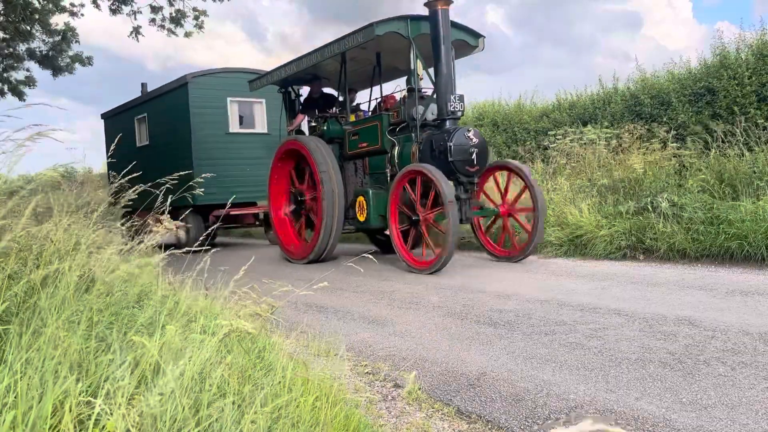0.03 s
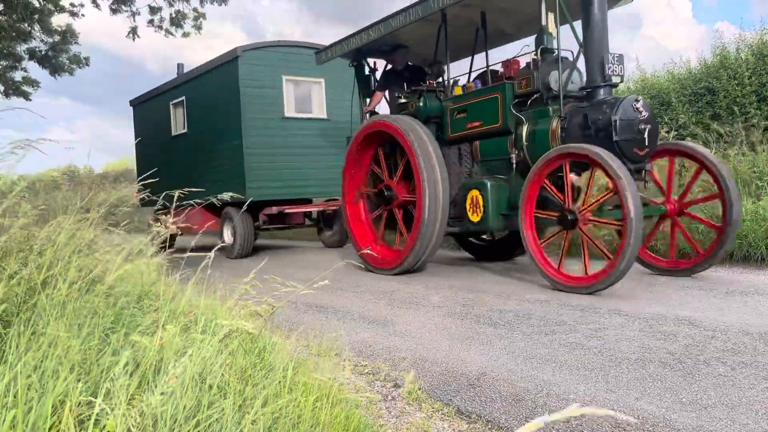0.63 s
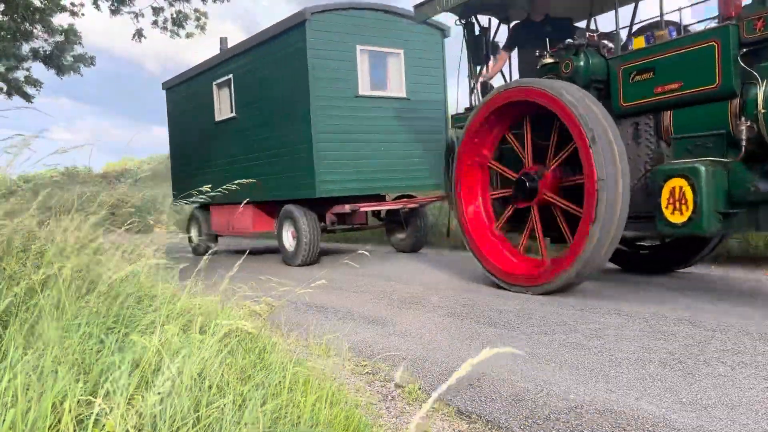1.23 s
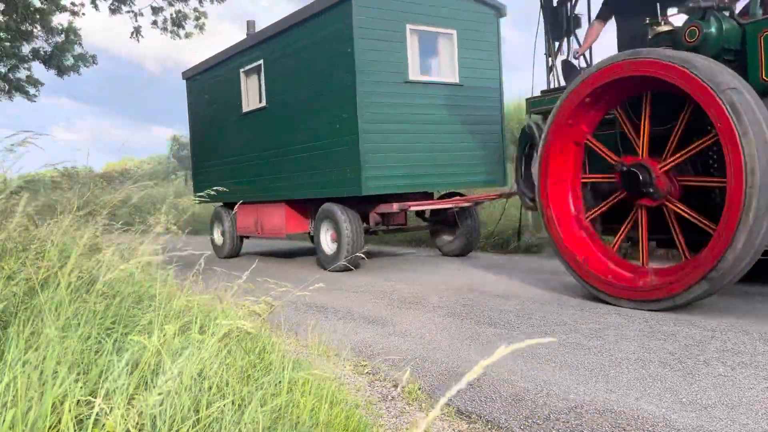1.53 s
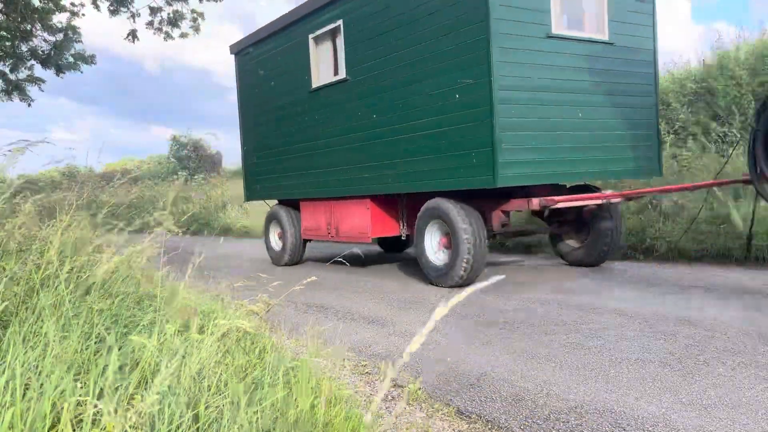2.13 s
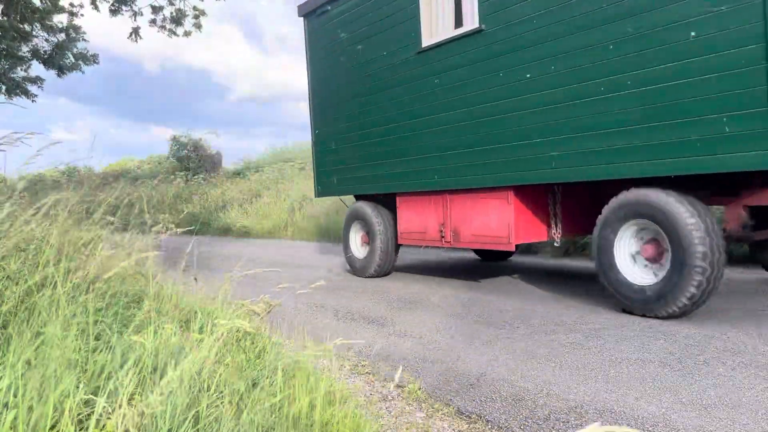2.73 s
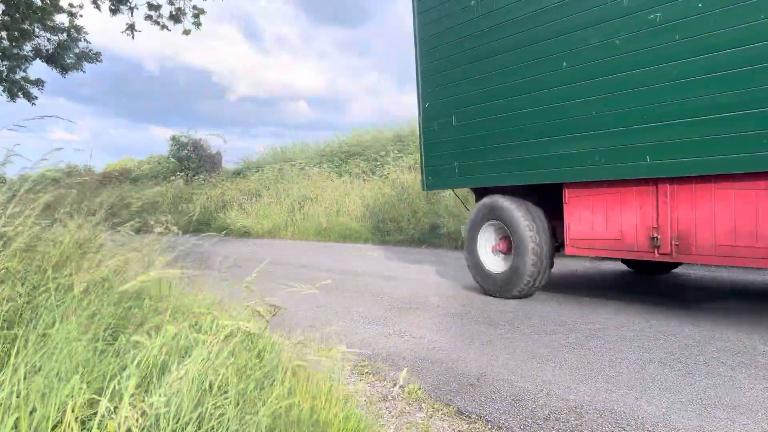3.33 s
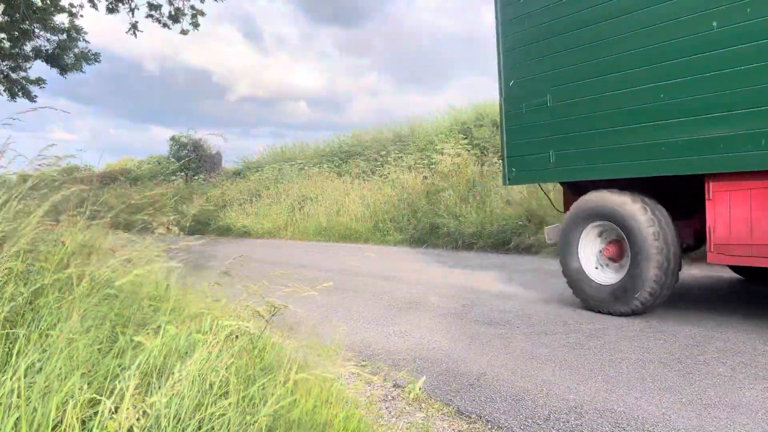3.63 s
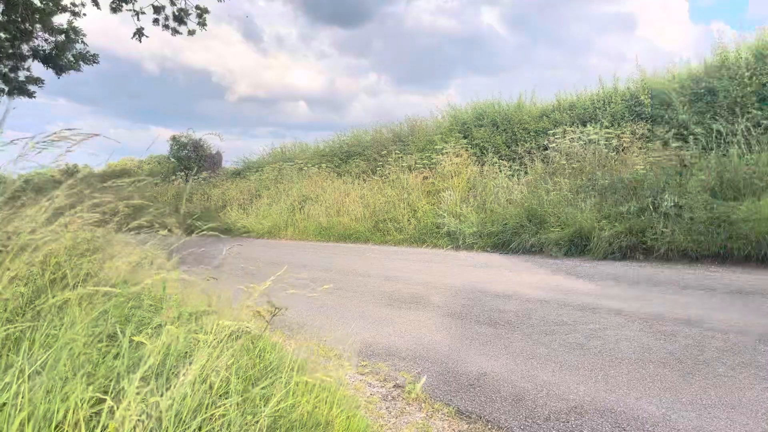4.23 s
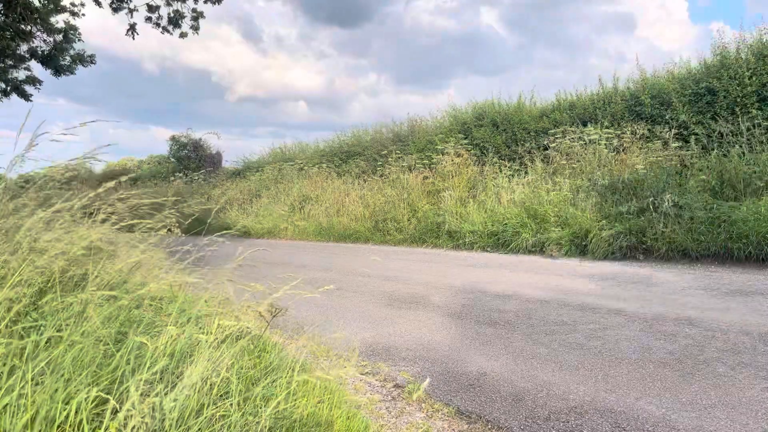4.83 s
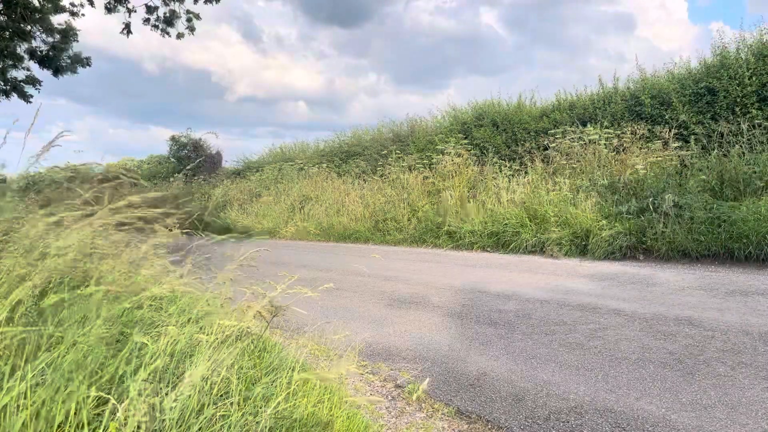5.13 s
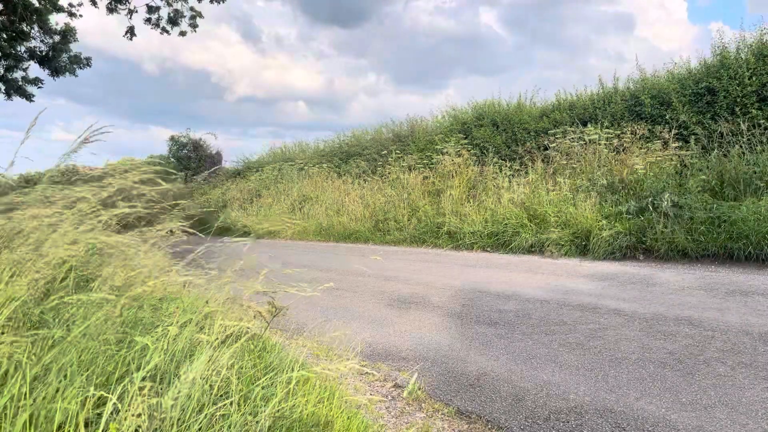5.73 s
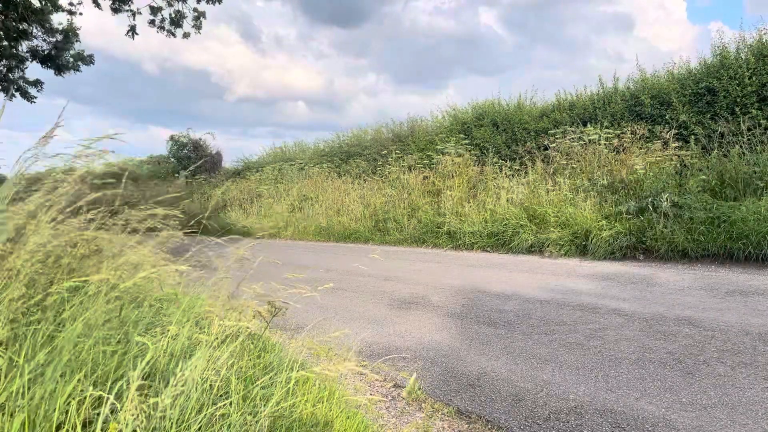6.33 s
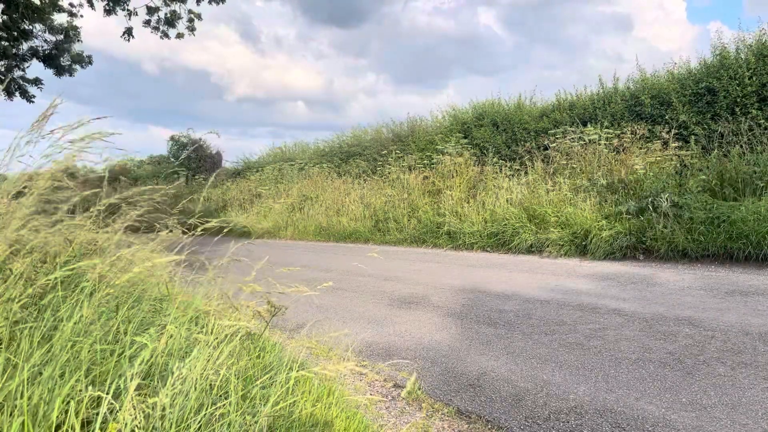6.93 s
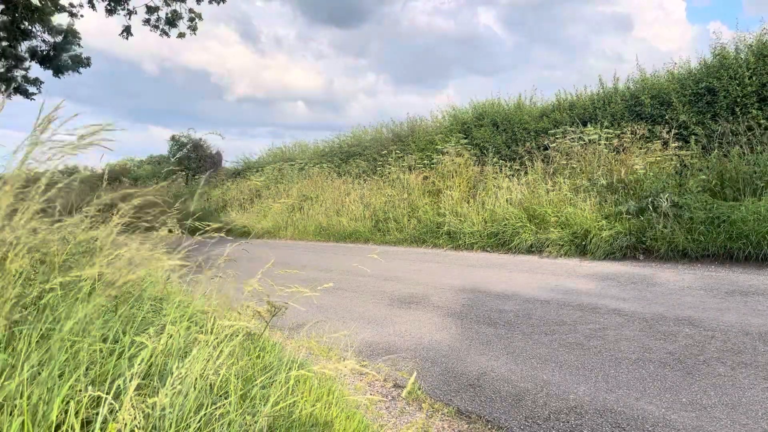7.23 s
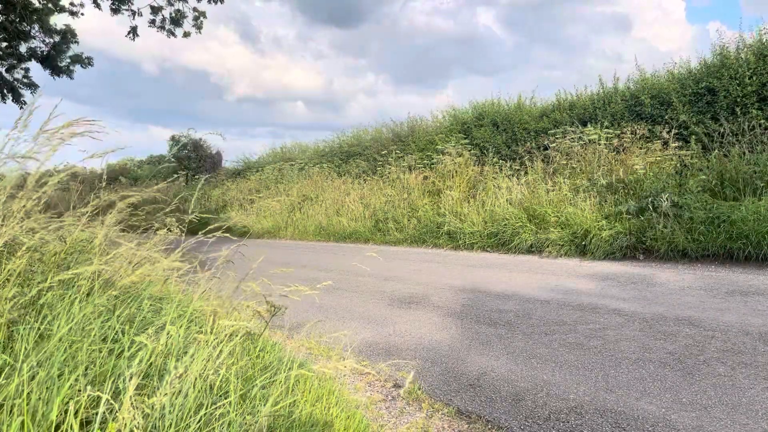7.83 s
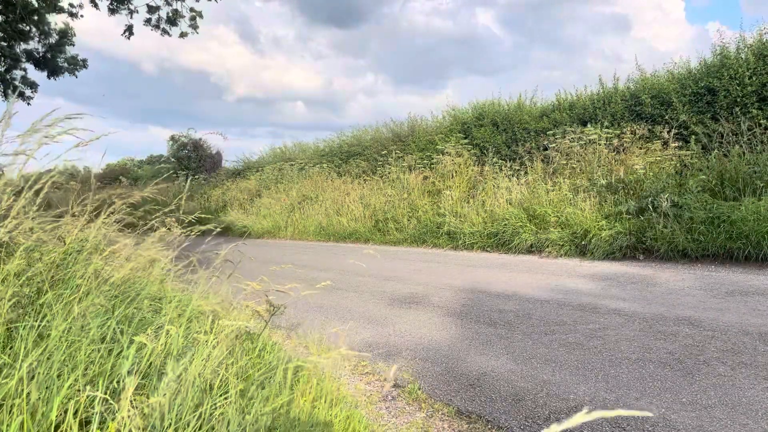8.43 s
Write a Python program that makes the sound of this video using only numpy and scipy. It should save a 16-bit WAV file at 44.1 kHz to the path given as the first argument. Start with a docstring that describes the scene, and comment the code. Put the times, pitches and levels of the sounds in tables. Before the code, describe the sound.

A steam traction engine chuffs and clatters past close by, blows one long and one short whistle, then recedes much quieter.

```python
"""Quick exhaust thuds, four to a crank turn, and the clatter of open gears: a steam traction engine tows
a living van close past on a country lane. Meshing teeth hum, a wheel chinks, road grit sets the ironwork
rumbling, steam hisses at the glands and grass rustles on the verge. Once past, it blows a three-pipe
chime whistle, one long blast and one short. The whistle drives an automatic gain control far down,
so the engine leaves much quieter than it came."""
import sys
import numpy as np
from scipy import signal
from scipy.fft import rfft, irfft
from scipy.io import wavfile
from scipy.ndimage import uniform_filter1d, minimum_filter1d

SR = 44100
rng = np.random.default_rng(int(sys.argv[2]) if len(sys.argv) > 2 else 0)


def unload_wav(signal):
    """Save mono or channel-first audio to the path in sys.argv[1] as 16-bit WAV at rate SR, clipped to [-1, 1]."""
    wavfile.write(
        sys.argv[1],
        SR,
        np.round(np.clip(np.atleast_2d(signal).T, -1, 1) * 32767).astype(np.int16),
    )


N = 379260
TIME = np.arange(N) / SR
ROAD_M_PER_S = 2.56

# engine speed: t/s, exhaust beat rate/Hz
BEAT_RATE = [(0, 13.29), (2.4, 13.29), (3.5, 13.17), (5.3, 13.56), (7.2, 13.73), (8.6, 13.68)]
# modes of the gear train: f/Hz, bandwidth/Hz, level/dB
GEAR_MODES = [(946, 88, -6), (1035, 35, -2), (1067, 22, -4), (1196, 45, -3), (1375, 47, 3), (1441, 22, 3.5),
              (1473, 75, -2.5), (1617, 31, 2), (1695.5, 14, 3.5), (1720, 21, -5.5), (1838, 45, -5),
              (2673, 400, -18), (3455, 54, -12), (4760, 63, -13.5), (5200, 100, -18)]
# modes of the ringing wheel: f/Hz, bandwidth/Hz, level/dB
WHEEL_MODES = [(1692, 22, -8), (2050, 44, -6), (2102, 27, 0), (3400, 50, -20)]
# dull knock of iron on iron: f/Hz, level/dB
KNOCK_SPECTRUM = [(60, -24.5), (120, -0.5), (240, 1), (400, -17), (600, -2.5), (1000, -12.5), (1900, -4),
                  (2500, -19), (5000, -27.5), (8000, -83.5), (9600, -85)]
# hiss of leaking steam, also used for scraping teeth: f/Hz, level/dB
HISS_SPECTRUM = [(1500, -9), (2250, -0.5), (2650, -18), (3450, -5), (4000, -1), (4700, 0.5), (5300, 1),
                 (6300, -7.5), (7300, -15), (8600, -21)]

# passage of a part: nearest t/s, distance/m, level/dB, excess loss/(dB/m), lift on approach/dB
GEAR_PASS = (2.03, 6.5, -27, 0.96, 8.5)
WHEEL_PASS = (2.5, 2, -34.5, 0.36, -2)
# track that sets a part's direction: abreast t/s, distance/m
ENGINE_PLACE, GEAR_PLACE, WHEEL_PLACE = (2.01, 5), (2.325, 2.98), (2.2, 1)


def gain_of(db):
    """Amplitude ratio of a level in decibels."""
    return 10 ** (np.asarray(db) / 20)


def unit_rms(x):
    """Normalisation to unit mean power."""
    return x / np.sqrt(np.mean(x ** 2) + 1e-20)


def follow(rows):
    """Linear interpolation of each column of a time table at every sample."""
    times, *columns = np.transpose(rows)
    return [np.interp(TIME, times, column) for column in columns]


def value_at(points, hz):
    """Interpolation of a spectrum on a logarithmic frequency axis."""
    f, value = np.transpose(points)
    return np.interp(np.log(hz + 1), np.log(f + 1), value)


def drift(hz):
    """Random fluctuation: low-passed Gaussian noise of unit rms."""
    f = np.fft.rfftfreq(N, 1 / SR)
    return unit_rms(irfft(rfft(rng.standard_normal(N)) * np.exp(-(f / hz) ** 2), N))


def colour(x, spectrum, size=16384):
    """Minimum-phase filtering to the given spectrum."""
    log_gain = np.log(gain_of(value_at(spectrum, abs(np.fft.fftfreq(size, 1 / SR)))))
    response = np.fft.ifft(np.exp(np.conj(signal.hilbert(log_gain)))).real[:size // 2]
    return signal.oaconvolve(x, response)[:N]


def ring(x, modes):
    """Modal superposition: damped resonators summed with alternating sign."""
    return sum((-1) ** k * gain_of(db) * signal.lfilter(*signal.iirpeak(hz, hz / width, SR), x)
               for k, (hz, width, db) in enumerate(modes))


def impacts(per_s, spread_db):
    """A Poisson process of blows, most small and a few large."""
    size = gain_of(spread_db * np.minimum(rng.exponential(1, N), 4))
    return unit_rms(size * rng.choice([-1, 1], N) * (rng.random(N) < per_s / SR))


def beat_count(lead_s=0.0, first_beat_s=0.0567):
    """Phase of the engine in exhaust beats: the integral of their rate."""
    rate = follow(BEAT_RATE)[0]
    return np.cumsum(rate) / SR + rate * lead_s - rate[0] * first_beat_s


def load(depth_db=1.5, lag_strokes=0.045):
    """Amplitude modulation: the drive presses harder at every piston stroke (two beats)."""
    return gain_of(depth_db * np.cos(2 * np.pi * (beat_count() / 2 - lag_strokes)))


def passing_db(nearest_s, nearest_m, db, loss_db_per_m, approach_db):
    """Spherical spreading, ground loss and directivity set the level of a part that rolls by."""
    # slow swell and sag of the whole engine: t/s, level/dB
    swell = [(0, 0.3), (.6, 1.7), (2.3, 1.24), (2.8, 0.5), (3.3, 3), (4.4, 2.9), (4.85, 4.5), (5.7, 2.5),
             (6.3, 3.5), (7.4, 2), (8.3, 4.5)]
    along_m = ROAD_M_PER_S * (TIME - nearest_s)
    range_m = np.hypot(along_m, nearest_m)
    loss_db = 20 * np.log10(range_m / nearest_m) + loss_db_per_m * (range_m - nearest_m)
    return db - loss_db - approach_db * along_m / range_m + follow(swell)[0]


def angle(t, abreast_s, across_m):
    """Angle of incidence in radians: negative on approach, zero abreast."""
    return np.arctan(ROAD_M_PER_S * (t - abreast_s) / across_m)


def doppler(nearest_s, nearest_m, max_shift=0.013):
    """Doppler effect: the frequency ratio is above 1 on approach and below 1 in retreat."""
    along_m = ROAD_M_PER_S * (TIME - nearest_s)
    return 1 - max_shift * along_m / np.hypot(along_m, nearest_m)


def rolling_ring(x, modes, nearest_s, nearest_m):
    """Moving resonator: its modes ring in source time and arrive Doppler-shifted."""
    emitted_s = np.cumsum(doppler(nearest_s, nearest_m)) / SR
    source_s = np.arange(0, emitted_s[-1], 1 / SR)
    return np.interp(emitted_s, source_s, ring(np.interp(source_s, emitted_s, x), modes))


def lane(x, place, wet_db, t60, size=1024, slant_rad=0.74):
    """Scattering adds a short tail; phase and level differences at two microphones give direction."""
    # share scattered by hedge, road and van: f/Hz, level/dB
    scatter = [(60, -27), (200, -22.5), (450, -7.5), (800, -4), (1400, 0), (2200, 12), (4000, 8.5),
               (9000, 12.5)]
    # phase lag of the left microphone for sound from hard right: f/Hz, lag/rad
    phase_lag = [(130, .1), (200, .7), (300, 1.3), (520, 1.45), (690, 2.3), (800, 2.35), (1000, 3.1),
                 (1500, 3.4), (2000, 4.9), (3500, 8.3), (10000, 25)]
    # left over right for sound from ahead: f/Hz, level/dB
    tilt_ahead = [(100, 0.5), (300, -2.5), (500, -3.5), (730, -8.5), (1020, 4), (1500, -6.5), (2600, -0.5),
                  (3400, 1.5), (5500, -2), (7000, 2.5), (8100, 18), (9500, -2)]
    # left over right for sound from the right: f/Hz, level/dB
    tilt_right = [(100, 0.5), (200, 5), (450, -3), (690, 1.5), (1100, 3.5), (1650, 0.5), (2600, -5.5),
                  (3400, 0), (5500, -5), (7000, 5.5), (8100, 13), (9500, 0.5)]
    framing = dict(nperseg=size, noverlap=size - size // 4)
    hz, t, spectra = signal.stft(x, SR, **framing)
    # the paths keep changing as the engine moves, so the tail has random phase
    decay = gain_of(-60 * t[1] / t60) ** 2
    lingering = np.sqrt(signal.lfilter([0, 1 - decay], [1, -decay], abs(spectra) ** 2))
    shape = (2, *spectra.shape)
    tail = np.sqrt(2) * lingering * (rng.standard_normal(shape) + 1j * rng.standard_normal(shape))
    hz, side = hz[:, None], np.array([0.5, -0.5])[:, None, None]
    azimuth = angle(t, *place) + slant_rad  # the pair faces up the lane at a slant
    direct = spectra * np.exp(-1j * side * np.sin(azimuth) * value_at(phase_lag, hz))
    wet = gain_of(value_at(scatter, hz) + wet_db)
    pair = (direct + wet * tail) / np.sqrt(1 + wet ** 2)
    # the housing shades each microphone differently as the source moves round it
    turned = np.sin(np.clip(azimuth, 0, np.pi / 2)) ** 2
    tilt = gain_of(side * ((1 - turned) * value_at(tilt_ahead, hz) + turned * value_at(tilt_right, hz)))
    pair *= tilt / np.sqrt(np.mean(tilt ** 2, axis=0))
    return signal.istft(pair, SR, **framing)[1][:, :N]


def grass(level_db=-48):
    """Flow noise: a steady breeze stirs the verge, uncorrelated between left and right."""
    # breeze in the grass: f/Hz, level/dB
    rustle = [(30, 0), (90, -3), (220, 14.5), (500, -6), (1100, -3), (2000, -8), (2700, -24.5),
              (3600, -0.5), (5000, -21.5), (6500, -6), (8000, -35.5), (9400, -46.5)]
    return gain_of(level_db) * np.array([unit_rms(colour(rng.standard_normal(N), rustle)) for _ in range(2)])


def glands(flutter_db=0.95):
    """Turbulent leakage: steam fizzes past the rods and excites a thin 8 kHz ring of the microphone."""
    # resonance of the microphone: f/Hz, bandwidth/Hz, level/dB
    mic_modes = [(7980, 230, -0.5), (8340, 330, -2)]
    fizz_pass = (3.5, 2.5, -37, -0.29, 6)
    mic_ring_pass = (1.4, 2.5, -54, 0.9, 3)  # the ring fades as the engine moves away
    fizz = unit_rms(colour(impacts(9000, 2.8), HISS_SPECTRUM))
    mic_ring = unit_rms(ring(ring(fizz, mic_modes), mic_modes))
    hiss = fizz * gain_of(passing_db(*fizz_pass)) + mic_ring * gain_of(passing_db(*mic_ring_pass))
    return hiss * gain_of(flutter_db * drift(30))


def gear_hum(cycles_per_beat=26.65, waver=0.02, throb_db=3.5):
    """Mesh frequency: the teeth hum at a pitch tied to engine speed, wavering and throbbing at random."""
    hum_pass = (1.6, 4, -38, 0.15, 2)
    hz = cycles_per_beat * follow(BEAT_RATE)[0] * doppler(*hum_pass[:2]) * (1 + waver * drift(21))
    tone = gain_of(throb_db * drift(21)) * np.sin(2 * np.pi * np.cumsum(hz) / SR)
    return unit_rms(tone) * gain_of(passing_db(*hum_pass))


def rubbing_iron():
    """Frictional excitation lifts single resonances out of the clatter; each swells and dies away."""
    # notes of the ironwork: t/s, half length/s, f/Hz, bandwidth/Hz, level/dB
    notes = [(0.35, 0.5, 845, 60, -35), (2.04, 0.06, 338, 16, -23), (2.43, 0.17, 679, 12, -26),
             (2.4, 0.45, 1185, 34, -36), (4.95, 0.6, 1145, 90, -43), (5.2, 0.3, 1678, 30, -48),
             (6.3, 0.8, 1110, 150, -49), (6.2, 0.6, 1675, 34, -52)]
    out = np.zeros(N)
    for t, half_s, hz, width, db in notes:
        mode = [(hz, width, 0)]
        note = unit_rms(ring(ring(impacts(600, 1), mode), mode))
        out += note * gain_of(db) * np.exp(-0.5 * ((TIME - t) / half_s) ** 4)
    return out


def wheel():
    """Sustained resonance: light taps keep one wheel singing with a thin note."""
    taps = impacts(260, 1) * load()
    return unit_rms(rolling_ring(taps, WHEEL_MODES, *WHEEL_PASS[:2])) * gain_of(passing_db(*WHEEL_PASS))


def chinks():
    """Cascaded resonance: a harder tap, filtered twice by the wheel's modes, swells into a clear chink."""
    # harder taps on the wheel: t/s, peak level/dB
    hard_taps = [(0.165, -26), (0.357, -19.5), (0.432, -25), (0.538, -24), (0.648, -22.5), (0.806, -28),
                 (0.885, -32), (0.962, -24.5), (1.265, -23), (1.435, -29), (1.582, -28.5), (2.485, -22),
                 (2.9, -23.5)]
    taps = np.zeros(N)
    for t, db in hard_taps:
        taps[round(t * SR)] = gain_of(db)
    unit_peak = abs(ring(ring(signal.unit_impulse(SR // 10), WHEEL_MODES), WHEEL_MODES)).max()
    return rolling_ring(ring(taps, WHEEL_MODES), WHEEL_MODES, *WHEEL_PASS[:2]) / unit_peak


def gears(level_db=-2, knock_db=-9):
    """Impact excitation: the open teeth rattle under load and ring the gear train."""
    teeth = impacts(600, 2.0) * load()
    ringing = unit_rms(rolling_ring(teeth, GEAR_MODES, *GEAR_PASS[:2]))
    knock = gain_of(knock_db) * unit_rms(colour(teeth, KNOCK_SPECTRUM))
    return (ringing + knock) * gain_of(passing_db(*GEAR_PASS) + level_db)


def clanks(rattle_s=0.016, scrape_s=0.025, level_db=-4.0, rebounds=5):
    """Backlash: each snatch of the gears is a hard blow and its rebounds, with a short bright scrape."""
    # snatches of the gears: t/s, relative level/dB, scrape offset/dB
    snatches = [(0.195, 2.5, -28), (0.228, -2, -32), (0.349, 2.5, -26), (0.417, -6, -22), (0.534, 6, -17.5),
                (0.788, 9.5, -17), (0.868, 3, -16), (0.909, 6, -27), (0.953, 5, -15), (1.095, -5.5, -2),
                (1.247, 2.5, -15), (1.272, 3.5, -16.5), (1.574, 7, -19), (1.708, -7, 3),
                (1.864, 7.5, -29.5), (2.004, 0, -14), (4.163, 9.5, -6.5), (4.549, -8, -21), (4.714, 3, -10),
                (4.765, 7.5, -6), (4.934, -18, -10), (5.167, 4.5, -6)]
    blows, scrape_envelope = np.zeros((2, N))
    for t, db, scrape_db in snatches:
        delays = np.append(0, 2 * rattle_s * rng.random(rebounds))
        sizes = np.exp(-delays / rattle_s / 2)
        blows[np.round((t + delays) * SR).astype(int)] += gain_of(db) * sizes / np.linalg.norm(sizes)
        onset = round(t * SR)
        age = TIME[:N - onset]
        scrape_envelope[onset:] += gain_of(db + scrape_db) * np.exp(-np.minimum(age / scrape_s, 20))
    blow_rms = np.linalg.norm(ring(signal.unit_impulse(SR // 4), GEAR_MODES)) / np.sqrt(2 * rattle_s * SR)
    ringing = gain_of(level_db) * rolling_ring(blows, GEAR_MODES, *GEAR_PASS[:2]) / blow_rms
    scrape = scrape_envelope * unit_rms(colour(impacts(2800, 2.7), HISS_SPECTRUM))
    return (ringing + scrape) * gain_of(passing_db(*GEAR_PASS))


def frame(level_db=-2.5, rims_db=-2.5, knock_db=-9, rims_fade=0.13, knock_fade=0.1, lurch_db=0.5):
    """Forced vibration: road grit shakes frame and rims; the verge absorbs rims and knocks first."""
    # modes of the frame: f/Hz, bandwidth/Hz, level/dB
    frame_modes = [(177.5, 9.2, 5), (310, 85, 1.5), (337, 49.4, 12), (382, 11, -5)]
    # modes of the wheel rims: f/Hz, bandwidth/Hz, level/dB
    rim_modes = [(405, 20, -6), (477, 32, -1.5), (506, 24, -2.5), (631, 63, -6.5), (687.7, 19, 0.5),
                 (857, 21, -4.5)]
    # brief booms of the frame: t/s, half length/s, level/dB
    jolts = [(1.24, 0.053, 2), (2.05, 0.056, 3), (2.213, 0.0097, 5), (2.495, 0.15, 2.5), (2.969, 0.02, 12)]
    frame_pass = (2, 5, -23.5, 1.45, 1.5)
    shake_db = passing_db(*frame_pass)
    far_db = shake_db - shake_db.max()
    jolt_db = sum(db * np.exp(-((TIME - t) / half_s) ** 2) for t, half_s, db in jolts)
    grit = impacts(1800, 2.9) * gain_of(lurch_db * drift(4.9))
    rumble = gain_of(jolt_db) * unit_rms(rolling_ring(grit, frame_modes, *frame_pass[:2]))
    rims = gain_of(rims_db + rims_fade * far_db) * unit_rms(rolling_ring(grit, rim_modes, *GEAR_PASS[:2]))
    knock = gain_of(knock_db + knock_fade * far_db) * unit_rms(colour(grit, KNOCK_SPECTRUM))
    return (rumble + rims + knock) * gain_of(shake_db + level_db)


def exhaust(lead_s=0.01578, opening_s=0.0015, uneven_db=0.47, eddies_db=-13):
    """Source and filter: the chimney shapes valve puffs and eddies into thuds; a boom carries forward."""
    # a puff as it leaves the chimney: f/Hz, level/dB
    chimney = [(15, -41), (28, -41), (38, -2.5), (52, -2.2), (66, -0.8), (80, 1.5), (95, -9.5), (125, -17),
               (175, -17.5), (260, -9), (600, -102)]
    exhaust_pass = (2, 2.5, -21, 0.35, -0.24)
    openings = np.diff(np.floor(beat_count(lead_s)), prepend=-1).clip(0, 1)
    pulses = unit_rms(openings * gain_of(uneven_db * drift(29)))
    puff = np.exp(-0.5 * (np.linspace(-0.05, 0.05, SR // 10 + 1) / opening_s) ** 2)
    puffs = signal.oaconvolve(pulses, puff / puff.sum(), "same")
    thuds = unit_rms(colour(puffs + gain_of(eddies_db) * rng.standard_normal(N), chimney))
    ahead = np.maximum(-np.sin(angle(TIME, *ENGINE_PLACE)), 0)
    boom = ahead * ring(thuds, [(39.8, 3.5, 1.1)])
    return (thuds + boom) * gain_of(passing_db(*exhaust_pass))


def pipe(hz, db, third_db, waver=0.0018, flutter_db=-0.5, fringe_db=-27, fringe_hz=70):
    """A stopped pipe sounds odd harmonics: a fundamental fringed by turbulence, and a thin third."""
    phase = 2 * np.pi * np.cumsum(hz * (1 + waver * drift(94.0))) / SR
    fringe = drift(fringe_hz) * np.sin(phase) + drift(fringe_hz) * np.cos(phase)
    fundamental = gain_of(db + flutter_db * drift(41)) * (np.sin(phase) + gain_of(fringe_db) * fringe)
    third = gain_of(third_db + 2 * drift(10)) * np.sin(3 * phase)
    return np.sqrt(2) * (fundamental + third)


def whistle(valve_s=0.015, warm_s=0.2, jet_lead_s=0.014, cold_jet_db=-7.5):
    """Sound speed rises with temperature: three pipes on one valve go sharp as hot steam fills them."""
    # pipes, low to high: hot f/Hz, share flat when cold, share bent by spit, third harmonic level/dB
    pipes = [(527.5, .035, -0.014, -20.5), (695.5, .08, 0.016, -31), (790.4, .105, 0.0698, -37.5)]
    # pulls of the valve: t/s, length/s, chill (0-1), pitch factor, jet level/dB, water (0-1)
    blasts = [(2.952, 0.707, 0.94, 1.0, -16, 0.96), (3.805, 0.18, .2, 1.008, -17, 0.19)]
    # the pipes trade loudness: t/s, low level/dB, middle level/dB, top level/dB
    voicing = [(2.955, -32.5, -17, -19.5), (2.993, -9, -19, -2), (3.045, -6, -12, -12.5),
               (3.11, -9.5, -20, -7.5), (3.17, -10, -3.5, -1.5), (3.25, -9.5, -20, 3), (3.39, -7, -12, 5),
               (3.5, -11, -1, 6), (3.631, -6, -1.5, -3), (3.81, -18.5, 0, -9.5), (3.91, -15, 1, -7.5),
               (3.969, -10.5, -1, -9.5)]
    # noise of the steam jet: f/Hz, level/dB
    jet_spectrum = [(250, -11.5), (500, -7.5), (830, 4), (960, -7.5), (1550, -5), (2250, -11.5),
                    (2800, -16.5), (3500, -19), (4000, -7.5), (4600, -7), (5300, -7.5), (6500, -18.5),
                    (8500, -29)]
    spit_after_s, spit_s, spit_db = 0.031, 0.0291, 16  # the valve spits water as it opens
    current = (TIME > blasts[1][0] - valve_s).astype(int)
    start, length, chill, tuning, jet_db, water = np.array(blasts)[current].T
    age = TIME - start
    pipe_gate = np.clip(np.minimum(age, length - age) / valve_s + 0.5, 0, 1)
    jet_gate = np.clip(np.minimum(age, length - jet_lead_s - age) / valve_s + 0.5, 0, 1)
    cold = chill * np.exp(-np.maximum(age, 0) / warm_s)
    spit = water * np.exp(-((age - spit_after_s) / spit_s) ** 2)
    chord = sum(pipe(hz * tuning * (1 - flat * cold + bend * spit), db, third_db)
                for (hz, flat, bend, third_db), db in zip(pipes, follow(voicing)))
    jet = unit_rms(colour(rng.standard_normal(N), jet_spectrum))
    return pipe_gate * chord, jet_gate * jet * gain_of(jet_db + cold_jet_db * cold + spit_db * spit)


def gain_control(x, target_db=-10, sense_s=0.056, recover_db_per_s=0.38):
    """Automatic gain control: the gain drops at once for a level over the target and barely recovers."""
    power = abs(uniform_filter1d((x ** 2).mean(0), int(sense_s * SR)))
    level_db = 10 * np.log10(power + 1e-12)
    recovery_db = recover_db_per_s * TIME
    over_db = np.maximum.accumulate(level_db + recovery_db) - recovery_db - target_db
    return x / gain_of(np.maximum(over_db, 0))


def scene():
    """Superposition: engine and whistle sound through the lane, over the rustle of the verge."""
    chord, jet = whistle()
    steam = lane(exhaust() + glands(), ENGINE_PLACE, wet_db=-4.0, t60=0.061)
    body = lane(frame() + gear_hum(), ENGINE_PLACE, wet_db=-6, t60=0.12)
    gearing = lane(gears() + clanks() + rubbing_iron(), GEAR_PLACE, wet_db=-7, t60=0.12)
    ringing = lane(wheel() + chinks(), WHEEL_PLACE, wet_db=-14, t60=0.12)
    chime = lane(chord, ENGINE_PLACE, wet_db=-11.5, t60=0.34, size=2048)
    rush = lane(jet, ENGINE_PLACE, wet_db=-6.5, t60=0.096)
    return grass() + ringing + gearing + body + steam + rush + chime


def record(dry, ceiling=0.93, edge_hz=15100):
    """Transduction: treble roll-off, gain control, a smooth peak limiter and a band limit."""
    # treble roll-off of the microphones: f/Hz, level/dB
    roll_off = [(8400, 0), (9600, -17), (10500, -26), (15000, -35)]
    ducked = gain_control(np.array([colour(channel, roll_off) for channel in dry]))
    peak_gain = ceiling / np.maximum(abs(ducked).max(0), ceiling)
    limited = ducked * uniform_filter1d(minimum_filter1d(peak_gain, size=600), size=600)
    low_pass = signal.firwin(255, edge_hz, window=("kaiser", 8), fs=SR)
    return signal.oaconvolve(limited, low_pass[None], "same")


dry = scene()
out = record(dry)
unload_wav(out)
```